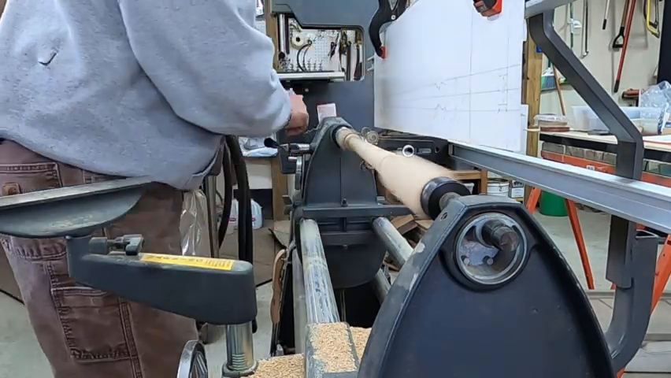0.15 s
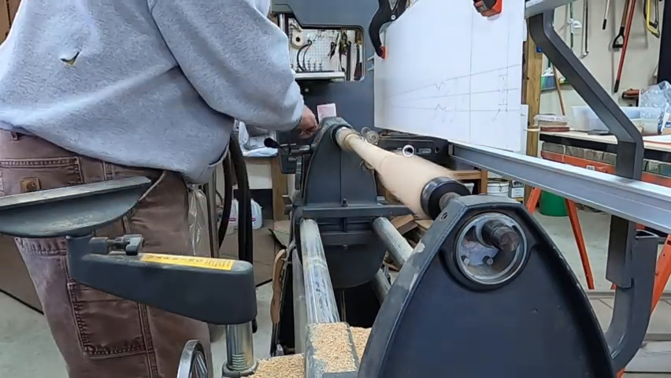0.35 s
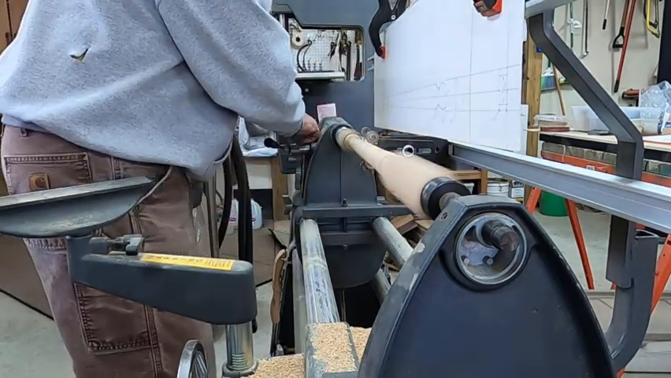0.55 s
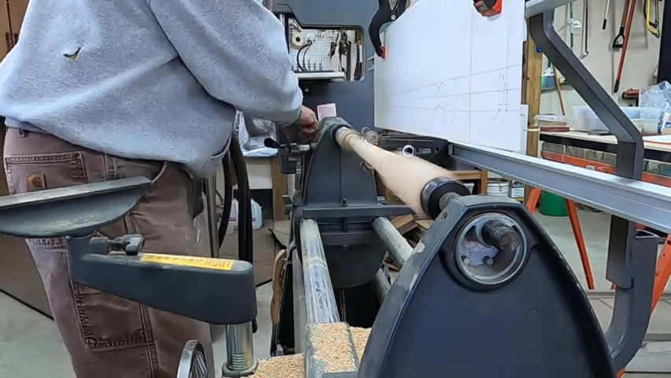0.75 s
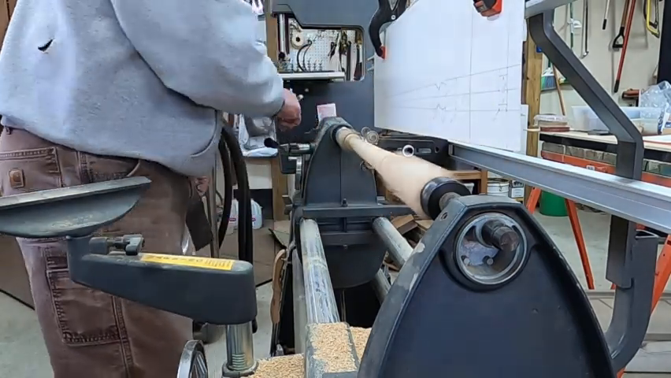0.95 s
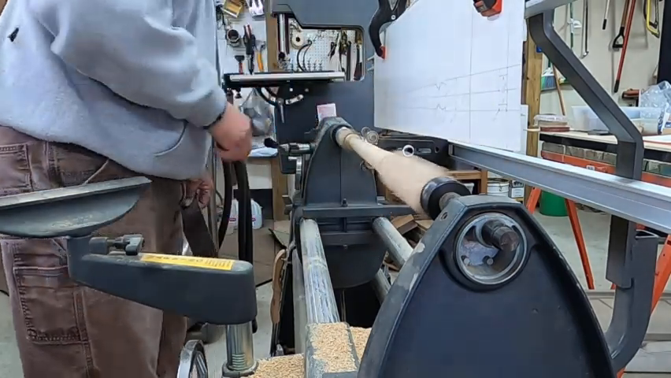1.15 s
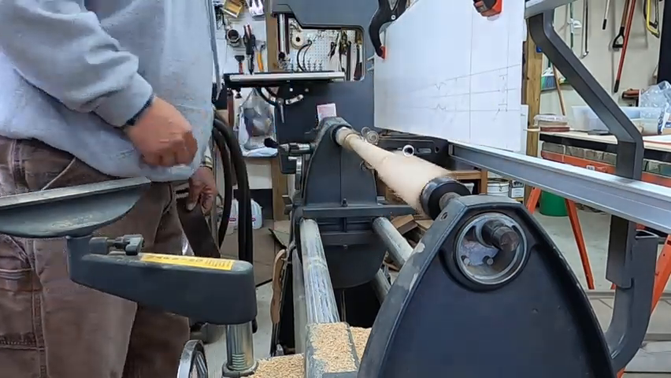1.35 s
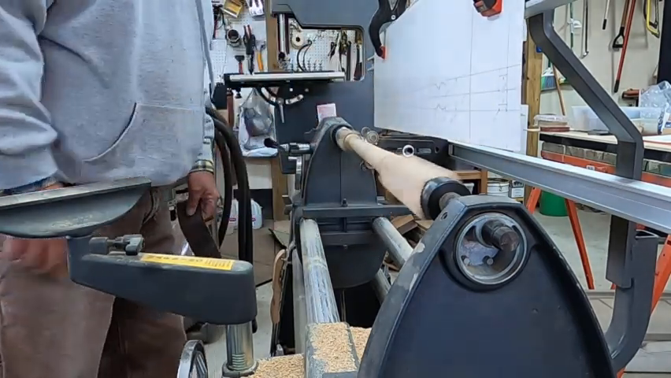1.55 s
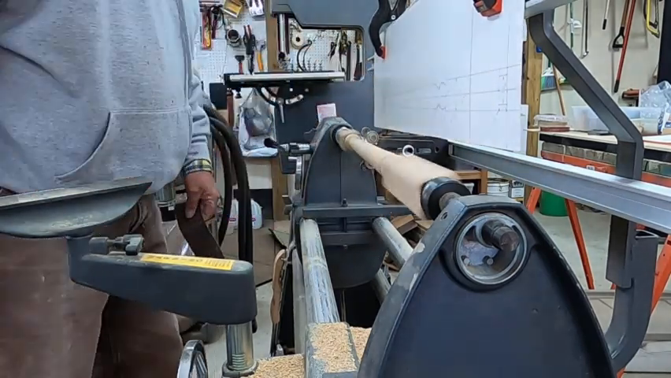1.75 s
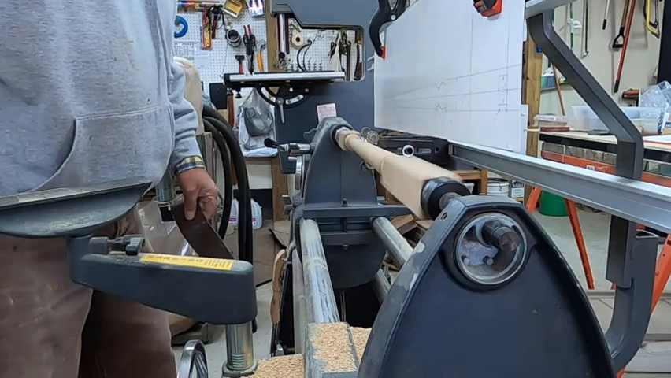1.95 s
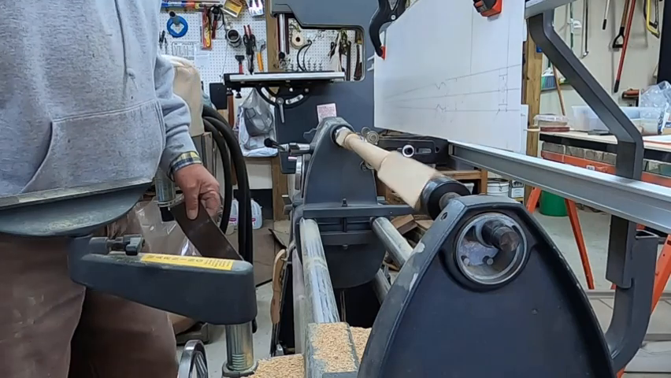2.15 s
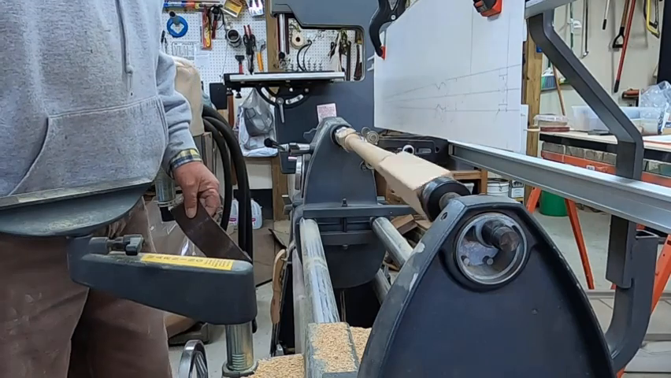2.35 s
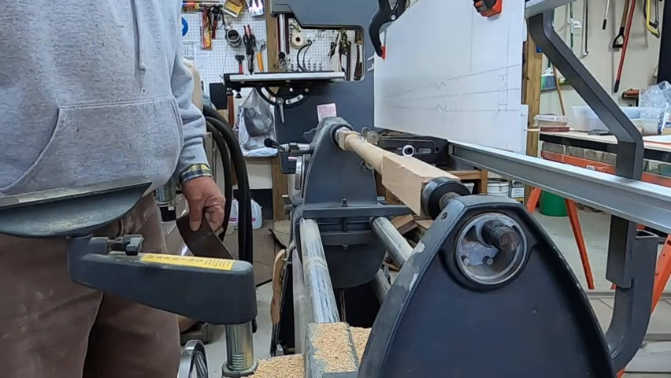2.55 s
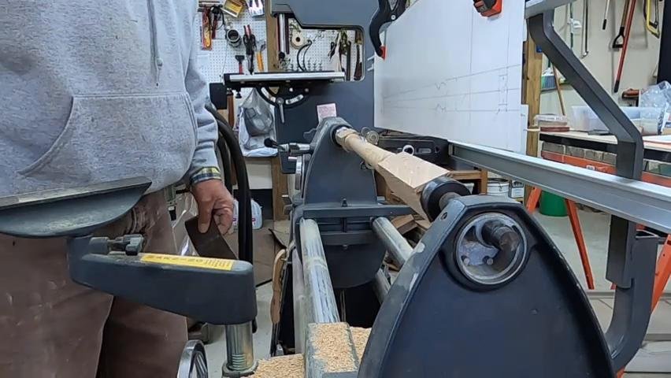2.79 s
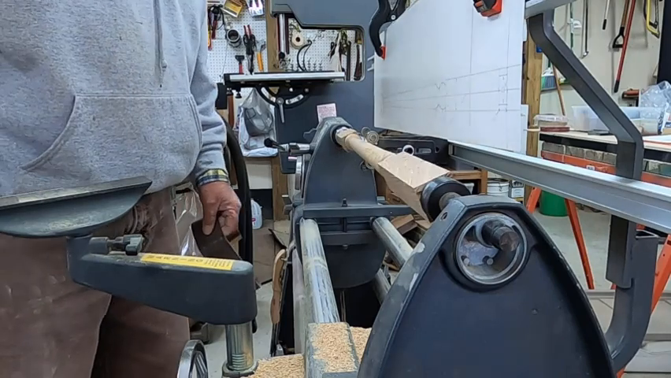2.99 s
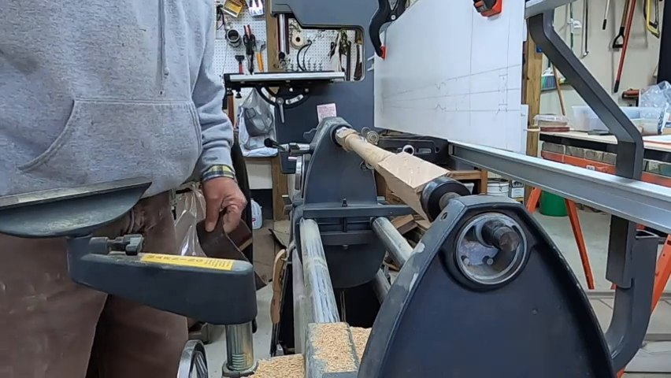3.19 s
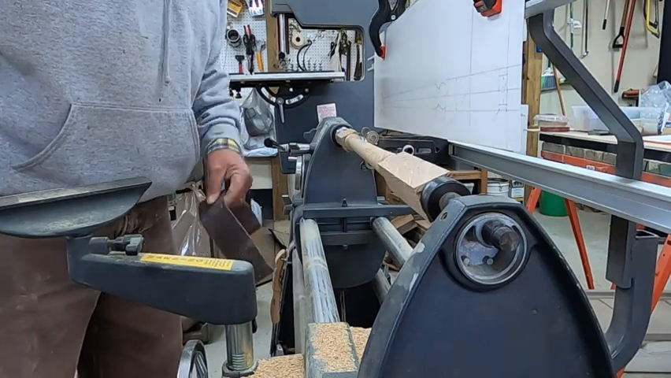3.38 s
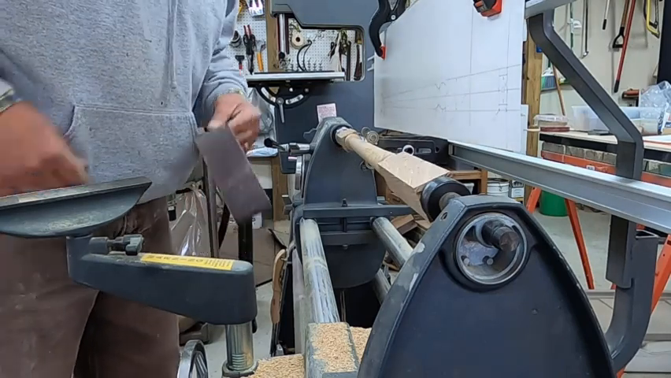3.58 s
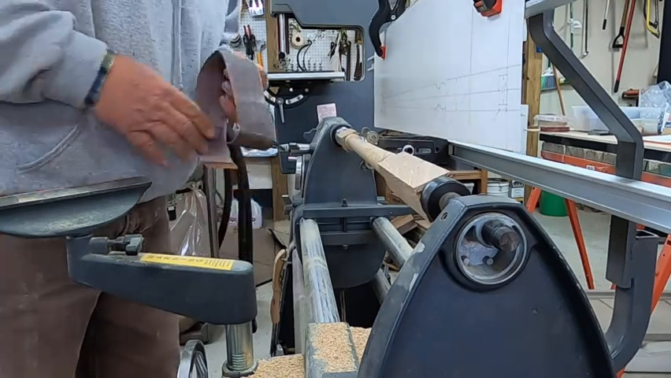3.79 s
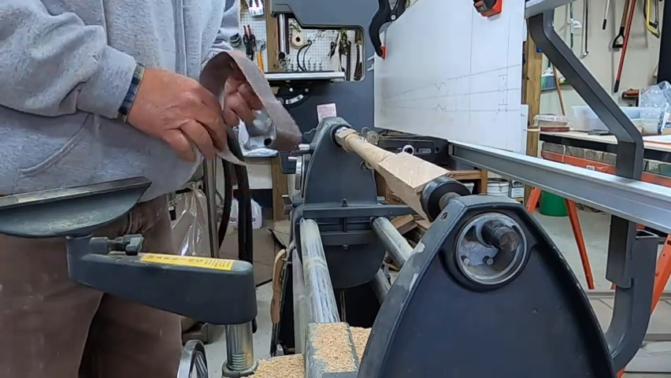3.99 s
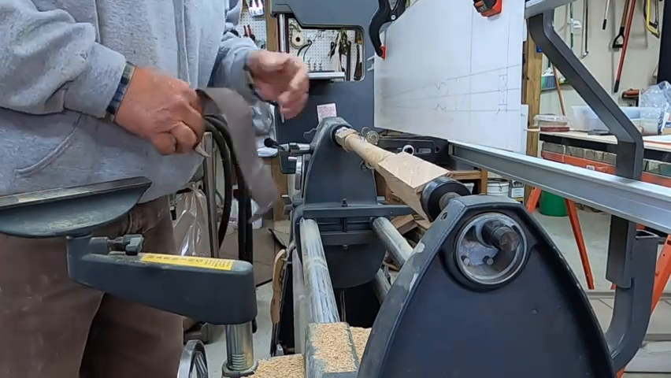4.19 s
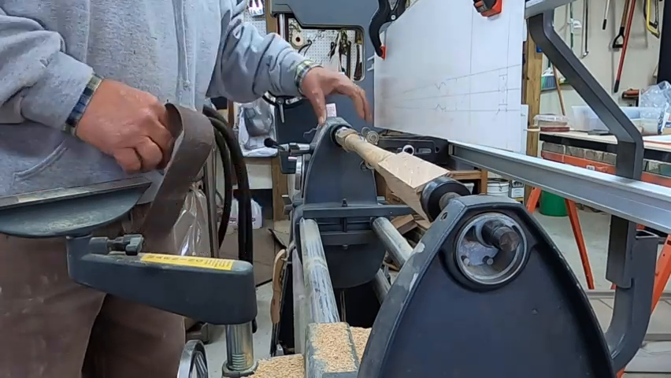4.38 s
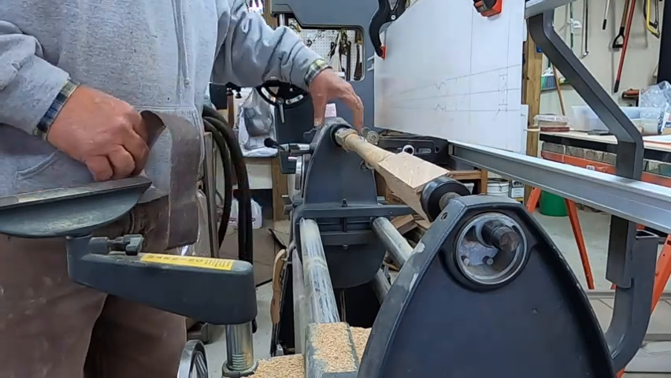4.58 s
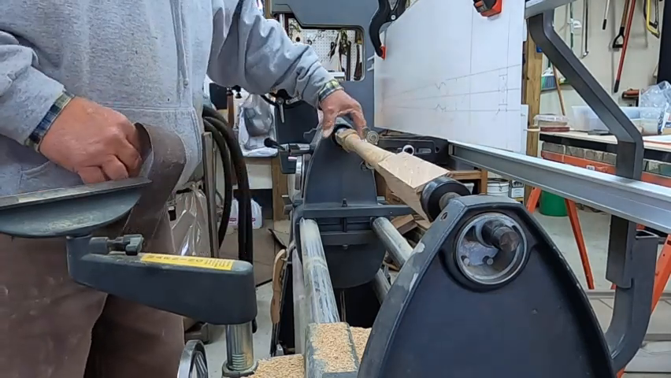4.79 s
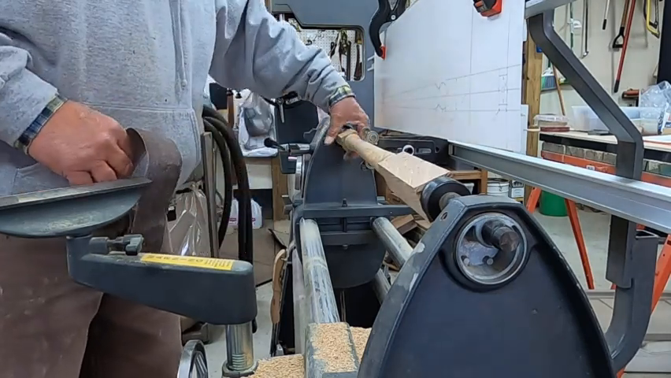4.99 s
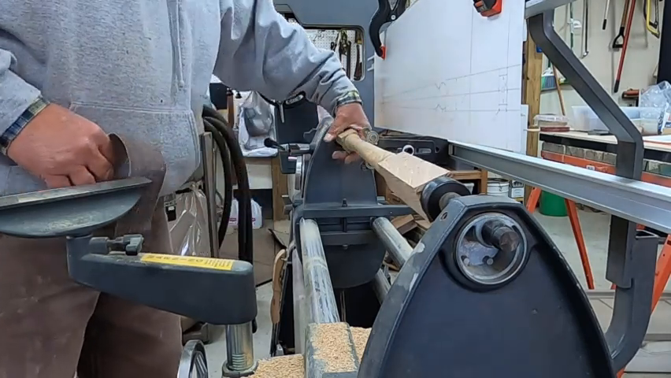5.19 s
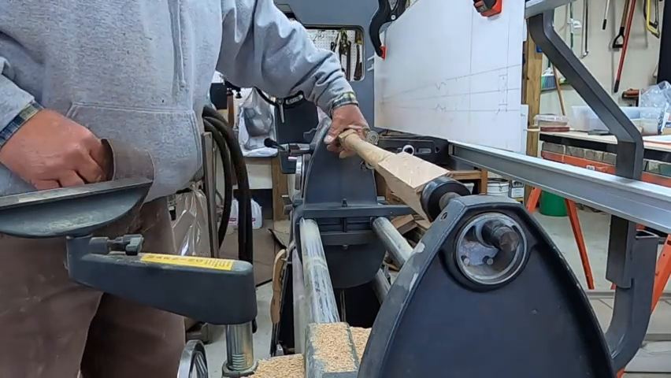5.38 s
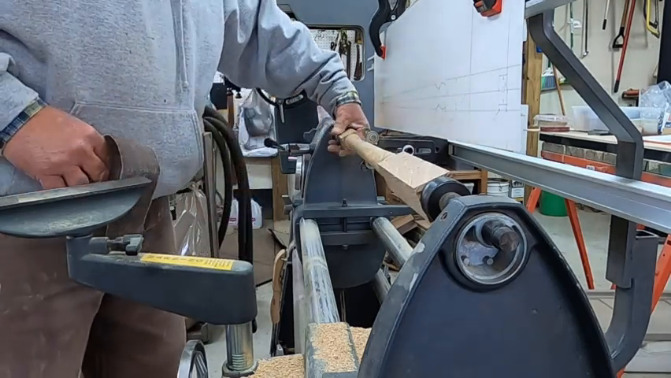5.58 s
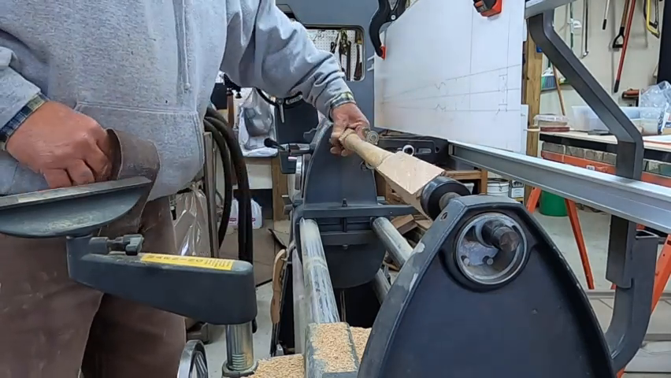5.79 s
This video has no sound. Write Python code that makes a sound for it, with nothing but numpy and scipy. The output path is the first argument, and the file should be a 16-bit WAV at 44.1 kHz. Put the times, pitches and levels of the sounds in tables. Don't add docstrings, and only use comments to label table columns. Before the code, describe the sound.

Close stereo pickup of a lathe spinning down, its steady roar breaking into slower throbs and low hums before dying away near three seconds. A quiet room with a distant fan and low hum remains. Dry little clicks and papery scrapes come from a flexed sandpaper strip, the sharpest around four seconds, then a palm and fingers gently thump the wooden piece, with faint ticks after.

```python
import sys
import numpy as np
from scipy import signal
from scipy.fft import rfft, irfft, next_fast_len
from scipy.io import wavfile
from scipy.ndimage import uniform_filter1d, map_coordinates

SR = 44100
rng = np.random.default_rng(int(sys.argv[2]) if len(sys.argv) > 2 else 0)


def inscribe(sig):
    pcm = np.round(np.clip(np.atleast_2d(sig).T, -1, 1) * 32767)
    wavfile.write(sys.argv[1], SR, pcm.astype(np.int16))


def volts_from_db(level):
    exponent = np.asarray(level, float) / 20
    return 10 ** exponent


N = 257544
T = np.arange(N) / SR
FFT_SIZE = next_fast_len(N + 8192)
HZ = np.fft.rfftfreq(FFT_SIZE, 1 / SR)
FULL_TURNS_PER_S = 33

# frequency in Hz, likeness [-1..1].
LATHE_ALIKE = [(30, 0.85), (60, 0.62), (110, 0.55), (200, 0.66), (360, 0.97), (650, 0.91), (1170, 0.83),
               (2120, 0.75), (3850, 0.56), (8000, -0.14)]


def unit(x):
    return x / np.sqrt(np.mean(x ** 2) + 1e-20)


def along(points, hz):
    point_hz, value = np.transpose(points)
    return np.interp(np.log(hz + 1), np.log(point_hz + 1), value)


def wobble(rate_hz):
    knots = rng.standard_normal(int(N * rate_hz / SR) + 4)
    return map_coordinates(knots, [T * rate_hz])


def filtered(x, gain):
    return irfft(rfft(x, FFT_SIZE) * gain, FFT_SIZE)[..., :N]


def modes(table):
    return sum(volts_from_db(db) * 1j * HZ * w / (c * c - HZ * HZ + 1j * HZ * w) for c, w, db in table)


def rush(gain, alike, force=1):
    turn = np.arccos(np.clip(along(alike, HZ), -1, 1)) / 2
    noise = force * rng.standard_normal((2, N))
    mid, side = filtered(noise, gain * [np.cos(turn), np.sin(turn)])
    return unit(np.array([mid + side, mid - side]))


def swells(rows):
    return sum(volts_from_db(db) * np.exp(-np.abs(2 * (T - s) / length_s) ** 3) for s, length_s, db in rows)


def follows(speed, law):
    db, slope_db, knee, fall_db = law
    return db + slope_db * np.log10(speed / FULL_TURNS_PER_S) - 10 * np.log10(1 + (knee / speed) ** (fall_db / 10))


def bearing_roar(drive, throb, slow):
    # frequency in Hz, full-speed density in dB per Hz.
    roar_spectrum = [(90, -57), (170, -13), (320, -9.5), (390, -25.5), (520, -11), (830, -12), (1100, -7),
                     (1800, -13.5), (3030, -18.5), (4800, -28), (5500, -29.5), (8000, -37), (10000, -47),
                     (15500, -68)]
    # centre in Hz, width in Hz, level in dB.
    panels = [(971, 27, 8), (1050, 8.1, 3.5), (1128, 5.8, 6.5), (1244, 35, 6), (1347, 10, 3),
              (1686, 20, 5.5), (1760, 17, 5.5), (1826, 21, 4), (2148, 16, 2.5), (2144, 12, 4.5),
              (2400, 71, -3), (2983, 55, 5), (3430, 70, 2.5), (4330, 350, 1), (4620, 60, 0.5),
              (6780, 350, 1), (7700, 310, 1.5)]
    # middle in seconds, length in seconds, level in dB.
    bites = [
        (.34, .1, -22),
        (.45, 0.13, -18),
        (.68, 0.25, -8),
        (1.03, 0.087, -13),
        (1.9, 0.14, -13),
        (2.04, .04, -15.5),
        (2.17, 0.1, -17),
    ]
    colour = volts_from_db(along(roar_spectrum, HZ))
    colour *= np.sqrt(1 + sum(np.abs(modes([row])) ** 2 for row in panels))
    gap_hz, gap_width_hz, gap_db = 1905, 124, -3.5
    colour *= volts_from_db(gap_db * np.exp(-((HZ - gap_hz) / gap_width_hz) ** 2))
    colour *= volts_from_db(np.interp(HZ, np.arange(800) * 22, rng.standard_normal(800)))
    roar = rush(colour, LATHE_ALIKE, throb * volts_from_db(0.81 * wobble(250)))

    hz, t, z = signal.stft(roar, SR, nperseg=512)
    dullness = np.interp(t, T, slow - swells(bites) + 0.031 * wobble(8.9))
    gain = volts_from_db(-4.5 * np.outer(np.log2((1 + hz / 1200) / 2), dullness))
    patches = uniform_filter1d(rng.standard_normal(z.shape[1:]), size=5, axis=0)
    patches = uniform_filter1d(patches, size=7, axis=1)
    gain *= volts_from_db((0.85 + np.interp(t, T, slow)) * unit(patches))
    return drive * volts_from_db(3.5) * signal.istft(z * gain, SR, nperseg=512)[1][:, :N]


def bed_and_guard(speed, drive, throb):
    # centre in Hz, width in Hz, level in dB.
    bed_modes = [(219.4, 23, 2), (185, 16, -1.5), (273.5, 14, 3), (291.3, 9.2, -1), (328.5, 6.8, 1)]
    guard_modes = [(669, 42, 6), (720, 14, 7), (592, 15, 1), (487, 8.8, 2.5), (770, 5.1, -3.5)]
    bed_law = (-32, -3, 5.5, 32)
    # middle in seconds, length in seconds, level in dB.
    bed_swells = [
        (.77, 0.074, -35.5),
        (1.06, 0.085, -36.5),
        (1.78, 0.21, -37.5),
        (2.29, 0.026, -38.5),
        (.05, .2, -40),
        (1.88, .12, -37.5),
        (2.55, 0.087, -49.5),
    ]
    cast = 1 / (1 + (HZ / 1200) ** 4) / (1 + (130 / (HZ + 1)) ** 4)
    bed_gain = volts_from_db(follows(speed, bed_law)) + swells(bed_swells)
    bed = bed_gain * rush(cast * modes(bed_modes), LATHE_ALIKE, throb)
    guard = drive * volts_from_db(-2.5) * rush(cast * modes(guard_modes), LATHE_ALIKE, throb)
    return bed + guard


def frame_shake(speed):
    # frequency in Hz, density in dB per Hz.
    shake_spectrum = [(13, -26), (26, -18.5), (75, -1.5), (108, -9), (156, -12), (178, -2.5), (190, -4.5),
                      (250, -20), (420, -120)]
    shake_law = (-34, 3.5, 1.5, 32)
    # middle in seconds, length in seconds, level in dB.
    shake_swells = [
        (.97, 0.084, -38.5),
        (1.14, 0.086, -43.5),
        (1.4, 0.11, -43.5),
        (1.58, 0.073, -47),
        (2.5, 0.12, -43),
    ]
    gain = volts_from_db(follows(speed, shake_law)) + swells(shake_swells)
    return gain * rush(volts_from_db(along(shake_spectrum, HZ)), LATHE_ALIKE)


def singing_frame(speed, slow):
    # (middle in seconds, length in seconds, level in dB).
    singing_modes = [
        (211.3, 4, (-45, 1.7, 1.2, 48), [(.3, 0.85, -26.5), (.9, 0.034, -26), (1.08, 0.033, -33), (1.37, 0.14, -31), (1.71, 0.18, -32), (1.95, 0.18, -38), (2.18, 0.065, -39), (2.45, 0.34, -37.5), (2.75, 0.35, -45), (2.98, .25, -50.5)]),
        (135.7, 0, (-44, 0.7, 1.3, 39), [(2.86, .55, -49), (0.38, 0.38, -41.5), (1.09, 0.11, -43), (1.5, 0.22, -49), (2.1, 0.26, -60)]),
        (70.4, 0, (-49, 2, 4.5, 21), [(1.42, .2, -36), (1.9, 0.21, -43.5), (2.6, 0.44, -45), (2.95, .3, -50)]),
        (672.3, 5, (-34.5, -1.5, 13, 37), [(.5, 0.31, -37), (.68, .08, -33.5), (.8, 0.1, -28.5), (.91, .08, -32), (1.03, 0.12, -33.5), (1.25, 0.26, -29.5), (1.45, 0.025, -36), (1.6, 0.075, -33), (1.69, 0.02, -27), (1.79, 0.037, -35), (2.17, 0.053, -37), (2.29, 0.04, -38), (2.36, 0.044, -42)]),
    ]
    eased_s = np.cumsum(slow) / SR
    out = np.zeros(N)
    for hz, rise_hz, law, rows in singing_modes:
        gain = (volts_from_db(follows(speed, law)) + swells(rows)) * volts_from_db(3.0 + hz / 300 * wobble(18))
        phase = 2 * np.pi * (hz * T + rise_hz * eased_s)
        phase += hz / 400 * (1 - .6 * slow) * wobble(11)
        out += gain * np.sin(phase)
    return out


def spindle_whine(speed, turns_rad):
    centre_turns, span_turns = 14.3, 6.2
    gain = volts_from_db(-33.5 + .3 * (centre_turns - speed))
    gain *= np.exp(-np.abs((speed - centre_turns) / span_turns) ** 4)
    slow_peak_db = 5 * np.exp(-((speed - 10.6) / 1.3) ** 2)
    fast_peak_db = 6 * np.exp(-((speed - 18.8) / 1.2) ** 2)
    gain *= volts_from_db(2 * wobble(14) + slow_peak_db + fast_peak_db)
    return gain * np.sin(27 * turns_rad + .8 * wobble(14))


def lathe():
    # time in seconds, spindle speed in turns/s.
    coast_down = [(0, 33), (.3, 30), (1.24, 18.4), (1.37, 16.2), (1.75, 11), (1.92, 9.7), (2.68, 1),
                  (3.1, .2)]
    roar_law = (-23, 13, 10.5, 24.5)
    # middle in seconds, length in seconds, level in dB.
    roar_swells = [
        (.97, 0.065, -42),
        (1.22, 0.036, -52),
        (1.69, 0.19, -39),
        (1.92, 0.052, -39),
        (2.02, 0.02, -41),
        (2.15, 0.076, -47),
        (2.3, 0.034, -60),
        (2.4, 0.14, -49.5),
        (2.6, 0.12, -57.5),
        (2.75, .12, -65),
    ]
    # frequency in Hz, left over right in dB.
    lathe_side = [(30, -5.5), (60, -1), (95, -11), (150, 0.5), (610, 0.5), (1200, -1.5), (2420, 1.5),
                  (3850, 3), (8000, 0), (12000, -4)]
    speed = np.interp(T, *np.transpose(coast_down))
    turns_rad = 2 * np.pi * np.cumsum(speed) / SR
    slow = np.clip(1 - speed / FULL_TURNS_PER_S, 0, 1)
    drive = volts_from_db(follows(speed, roar_law)) + swells(roar_swells)
    once_a_turn = np.cos(turns_rad + 1.94 * wobble(2.29))
    throb = volts_from_db((0.52 + 0.87 * slow) * once_a_turn + 0.22 * slow * wobble(21))

    machine = bearing_roar(drive, throb, slow) + bed_and_guard(speed, drive, throb) + frame_shake(speed)
    machine = machine + singing_frame(speed, slow) + spindle_whine(speed, turns_rad)
    coasting = np.interp(T, [2.98, 3.2], [1, 0])
    lean_db = along(lathe_side, HZ) / 2
    return filtered(coasting * machine, volts_from_db(np.array([lean_db, -lean_db])))


def room_tone():
    # frequency in Hz, density in dB per Hz.
    fan_spectrum = [(13, -42.5), (22, -0.5), (75, -2.5), (113, -10.5), (173, -7), (226, -7.5), (248, -17.5),
                    (301, -10), (366, -19), (459, -15.5), (494, -21.5), (592, -25.5), (800, -37),
                    (1040, -54), (1760, -120)]
    air_spectrum = [(350, -53), (600, -4), (760, -8.5), (1310, -2.5), (2170, -12), (3200, -17),
                    (4300, -19.5), (6300, -20), (7800, -27.5), (8800, -44), (10500, -49.5), (13500, -56),
                    (15500, -60)]
    # frequency in Hz, left-right likeness.
    room_alike = [(60, 1), (200, 0.94), (360, 0.95), (650, 0.64), (1170, 0.69), (2120, 0.6), (3850, 0.18),
                  (8000, .1)]
    # frequency in Hz, level in dB.
    hum_tones = [(596, -63), (319, -61), (77.3, -51.5), (172.5, -50.5), (898, -69), (117, -62.5)]
    # middle in seconds, length in seconds, level in dB.
    thuds = [
        (3.1, 0.44, -66),
        (4.1, 0.71, -48.5),
        (4.7, 0.083, -49),
        (5.38, 0.078, -47),
        (5.84, .1, -54),
    ]
    sleeves = [
        (2.6, 0.44, -64),
        (4.15, 0.82, -65.5),
        (5.1, 0.58, -69.5),
        (5.84, 0.2, -68.5),
    ]
    fan_swell = [
        (5.2, 0.37, -54),
    ]
    air_swell = [
        (4.2, 1.3, -73.5),
        (5.7, 1.4, -70.5),
    ]
    lull = [
        (5.57, 0.1, -10),
    ]
    low = 1 / (1 + (HZ / 110) ** 6)
    fan_colour = volts_from_db(along(fan_spectrum, HZ))
    thud = (volts_from_db(-54) + swells(thuds)) * rush(low * fan_colour, [(30, 0.28), (60, 1.0)])
    fan_gain = (volts_from_db(-48) + swells(fan_swell)) * volts_from_db(0.38 * wobble(16.0))
    fan = fan_gain * rush((1 - low) * fan_colour, room_alike)
    air_gain = (volts_from_db(-60.0) + swells(air_swell)) * volts_from_db(1.2 * wobble(6.1))
    air = air_gain * rush(volts_from_db(along(air_spectrum, HZ)), room_alike)
    weave = np.abs(modes([(3500, 3200, 11.5), (7500, 1100, -20.0)])) / (1 + (HZ / 9000) ** 6)
    cloth_gain = (volts_from_db(-77.5) + swells(sleeves)) * volts_from_db(-2.0 + 2.5 * wobble(25))
    cloth = cloth_gain * rush(weave, room_alike)
    hum = np.zeros(N)
    for hz, db in hum_tones:
        hum += volts_from_db(db + 1.5 * wobble(3)) * np.sin(2 * np.pi * hz * T + .4 * wobble(3))
    return ((thud + hum) * (1 - swells(lull)) + fan + air + cloth) * volts_from_db([[.5], [-.5]])


def scrape(length_s, centre_hz, rise_share, spread_octaves):
    n, size = int(length_s * SR), SR // 5
    hz = np.fft.rfftfreq(size, 1 / SR) + 1
    u = np.arange(n) / n
    stroke = np.minimum(u / rise_share, (1 - u) / (1 - rise_share)) ** 0.94
    clumps = volts_from_db(2.4 * np.repeat(rng.standard_normal(size // 60 + 1), 60)[:size])
    band = 1 / (1 + (np.log2(hz / centre_hz) / spread_octaves) ** 4)
    band *= volts_from_db(1.6 * np.interp(np.log2(hz), np.linspace(8, 14.5, 40), rng.standard_normal(40)))
    grit = unit(irfft(rfft(rng.standard_normal(size) * clumps) * band, size))
    return stroke * grit[:n]


def handling():
    # start in seconds, length in
    # seconds, level in dB, centre in Hz.
    rubs = [(0.66, .19, -49, 7000), (0.88, .093, -49, 6000), (1.87, 0.084, -43.5, 3400),
            (5.09, 0.034, -60, 2800), (5.0, .03, -58, 2700), (3.885, 0.029, -47, 1900),
            (1.768, 0.03, -40.5, 7100), (2.4, 0.054, -37.5, 2830), (3.9, 0.072, -55, 3400),
            (4.05, .1, -63, 5400), (4.0, .19, -60, 3000), (4.18, 0.06, -55, 2210), (4.18, 0.05, -53, 5900),
            (4.25, 0.045, -71, 4500), (4.42, 0.13, -54, 3300), (5.36, 0.12, -56.5, 3600)]
    flicks = [
        (2.46, .2, -56.5, 2500),
        (4.347, 0.032, -41.5, 3500),
        (4.35, 0.093, -42, 1980),
        (4.35, 0.073, -39, 7000),
    ]
    squeaks = [
        (1.832, 0.14, -58, 7700),
        (4.058, 0.03, -54.5, 3600),
        (4.075, 0.034, -60, 3550),
        (4.04, 0.09, -67, 7700),
        (4.125, .025, -59, 3700),
        (4.68, 0.13, -70, 7040),
        (5.09, 0.068, -71, 7160),
        (5.174, .2, -77, 7340),
    ]
    palms = [
        (5.0, 0.081, -47, 370),
        (4.999, 0.032, -43, 1140),
        (5.018, 0.12, -46.5, 870),
        (5.097, 0.065, -49, 810),
        (5.105, 0.085, -41.5, 490),
        (5.09, 0.066, -55, 1400),
        (5.12, .16, -53, 930),
    ]
    brushes = [
        (2.194, 0.034, -47.5, 3950),
        (2.31, 0.12, -54, 4320),
        (2.74, 0.033, -62, 5400),
        (3.679, 0.075, -64, 2700),
        (3.876, 0.037, -51, 5800),
        (4.05, .1, -65, 5500),
        (2.41, 0.025, -46, 3500),
        (4.84, 0.066, -65, 6500),
        (4.911, 0.051, -53.5, 5000),
    ]
    stiff = [
        (4.348, 0.06, -45.5, 2400),
        (4.355, 0.036, -46, 4140),
        (4.36, 0.027, -41.5, 7000),
        (4.2, 0.034, -53, 2280),
        (4.205, 0.027, -49.5, 7500),
        (4.46, .06, -56, 7800),
    ]
    swipes = [
        (4.185, .045, -49.5, 6000),
        (4.19, .04, -54, 2500),
        (4.44, 0.074, -58.5, 7000),
    ]
    # start in seconds, peak in dB, ring in Hz, t60 in seconds.
    snaps = [(3.46, -46, 5500, .002), (3.655, -38, 2130, 0.012), (3.706, -36, 2500, 0.003),
             (3.711, -34, 2700, 0.0036), (3.711, -48, 6000, .002), (3.889, -29.5, 5600, 0.006),
             (3.889, -40, 9000, .005), (3.889, -33, 3670, 0.005), (3.921, -47, 5500, .003),
             (3.889, -24, 1940, 0.0031), (4.05, -35, 3500, 0.0045), (4.05, -35, 1070, .008),
             (4.352, -36, 2470, 0.0053), (4.224, -42, 7700, .004), (4.224, -43, 2400, .004),
             (4.407, -28, 1600, 0.0055), (4.913, -42, 6700, 0.0052), (5.003, -43, 3850, 0.0087),
             (5.005, -46, 4500, .008), (3.656, -52, 4500, .005), (5.163, -38, 7500, 0.0045),
             (5.334, -33.5, 7600, 0.0032), (5.451, -35, 7700, 0.0027)]
    # centre in Hz, width in Hz, level in dB.
    strip_modes = [(1520, 290, 2.5), (2590, 510, -2.5), (3850, 310, -5), (5940, 1200, -15),
                   (7600, 750, -5.5), (9400, 690, -6.5)]
    kinds = [(swipes, .8, 1.1), (rubs, 0.35, 1.14), (brushes, 0.42, 0.61), (flicks, 0.14, 1.45),
             (squeaks, 0.33, 0.08), (palms, 0.062, 0.52), (stiff, 0.45, 0.21)]
    out = np.zeros(N + SR)
    for rows, rise_share, spread_octaves in kinds:
        for s, length_s, db, hz in rows:
            rub = volts_from_db(db) * scrape(length_s, hz, rise_share, spread_octaves)
            out[round(s * SR):][:len(rub)] += rub
    out[:N] = filtered(out[:N], 0.74 * np.abs(1 + modes(strip_modes)))
    out = out[:N]
    t = np.arange(SR // 40) / SR
    for s, db, hz, t60_s in snaps:
        ring = np.sin(2 * np.pi * hz * t) * volts_from_db(-60 * t / t60_s) * (1 - np.exp(-t * hz * 1.4))
        out[round(s * SR):][:len(t)] += volts_from_db(db) * ring
    return filtered(out, 0.12 + 0.83 / (1 + (HZ / 9000) ** 8))


def finger_taps():
    # mode in Hz, level in dB, t60 in seconds.
    wood = [(644, -3.5, 0.06), (1074, 3.5, 0.042), (1300, -2, .03), (1535, 0, .045), (1750, -10, 0.025)]
    # start in seconds, level in dB.
    landings = [
        (5.0, -37.5),
        (5.009, -42),
        (5.023, -41),
        (5.097, -52),
        (5.106, -47),
        (5.112, -49),
        (5.121, -48),
        (5.136, -50),
    ]
    out, t = np.zeros(N + SR), np.arange(SR // 10) / SR
    onset = 1 - np.exp(-t / .0012)
    for s, db in landings:
        for hz, mode_db, t60_s in wood:
            level = volts_from_db(db + mode_db + rng.normal(0, 2.9) - 60 * t / t60_s)
            out[round(s * SR):][:len(t)] += level * np.sin(2 * np.pi * hz * t) * onset
    return filtered(out[:N], 1 / (1 + (HZ / 2100) ** 8))


def walls(x):
    # frequency in Hz, t60 in seconds.
    wall_t60 = [(200, 0.29), (2000, 0.26), (10000, 0.19)]
    hz, t, z = signal.stft(rng.standard_normal((2, SR // 2)), SR, nperseg=256)
    decay = volts_from_db(-60 * t / along(wall_t60, hz)[:, None])
    tail = signal.istft(z * decay, SR, nperseg=256)[1]
    delayed = np.pad(x, (300, 0))[None]
    return signal.fftconvolve(delayed, tail / np.linalg.norm(tail[0]), axes=1)[:, :N]


def scene():
    hands = handling() + finger_taps()
    mix = lathe() + hands * volts_from_db([[1.2], [-1.2]]) + volts_from_db(-7.0) * walls(hands) + room_tone()
    return np.array([np.roll(mix[0], 1), mix[1]])


def roll_off(x):
    return signal.sosfilt(signal.butter(12, 15550, fs=SR, output="sos"), x)


def record(dry):
    held = dry / (1 + np.abs(dry / .55) ** 4) ** .25
    return roll_off(held)


dry = scene()
out = record(dry)
inscribe(out)
```